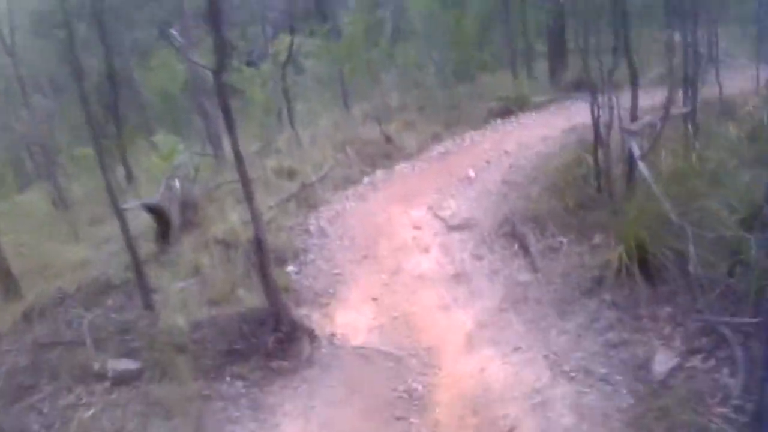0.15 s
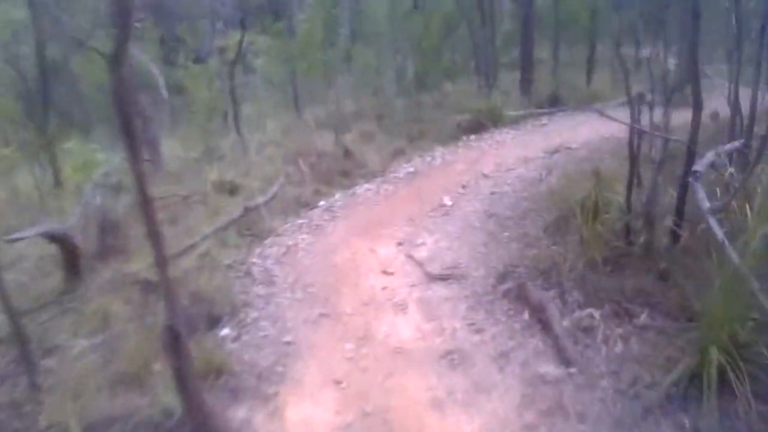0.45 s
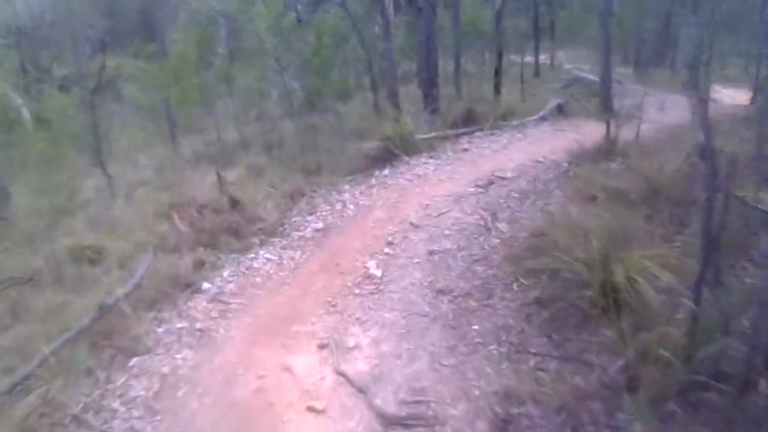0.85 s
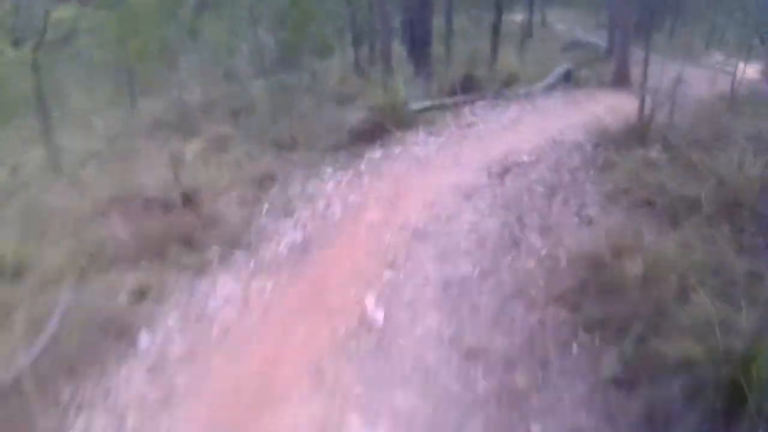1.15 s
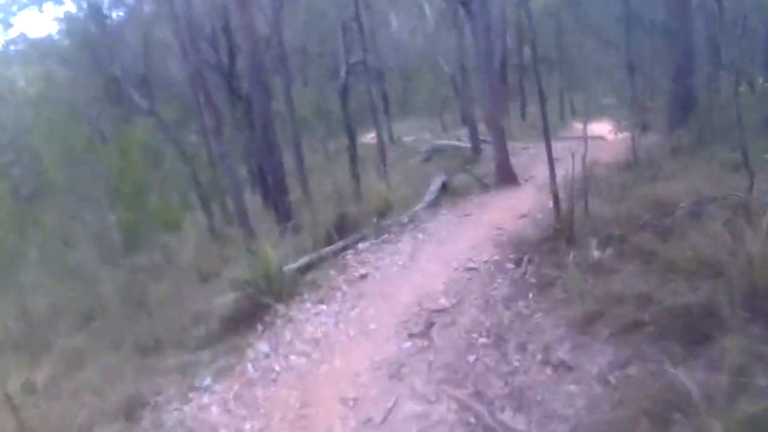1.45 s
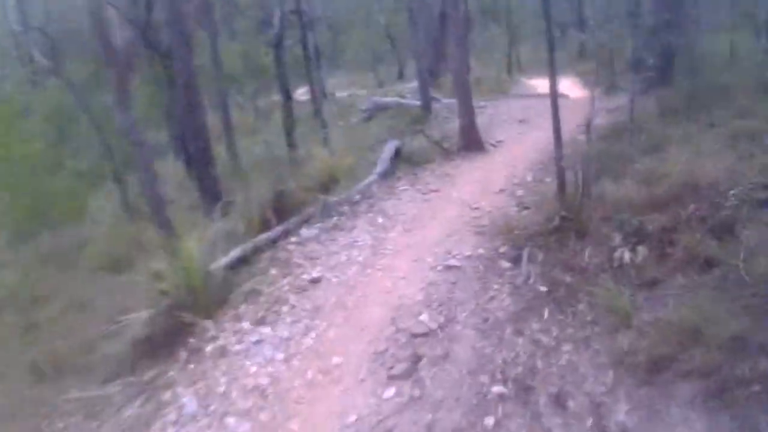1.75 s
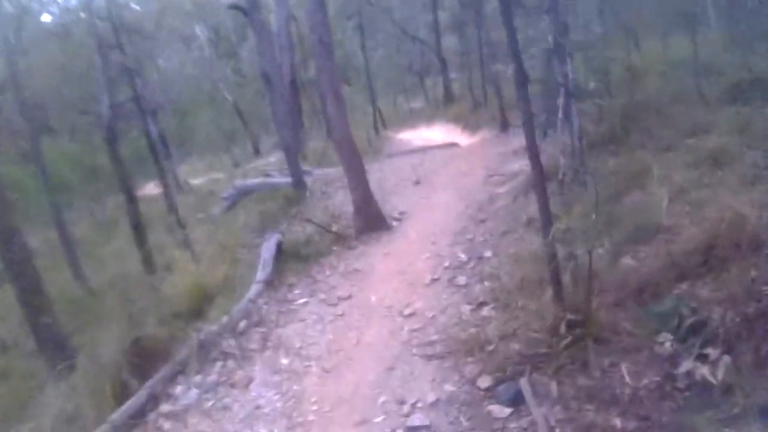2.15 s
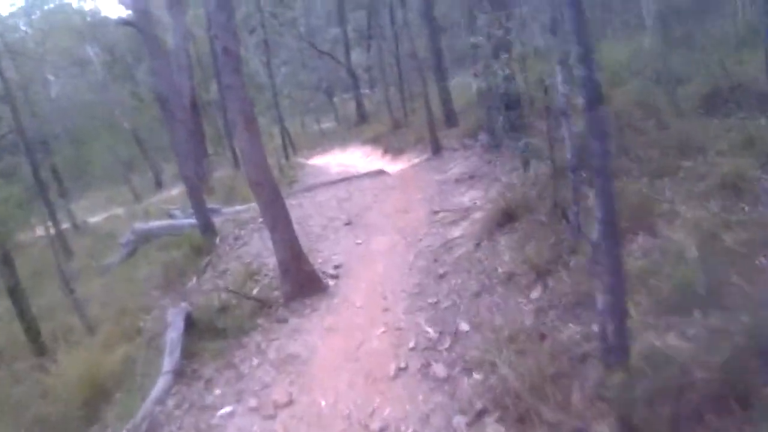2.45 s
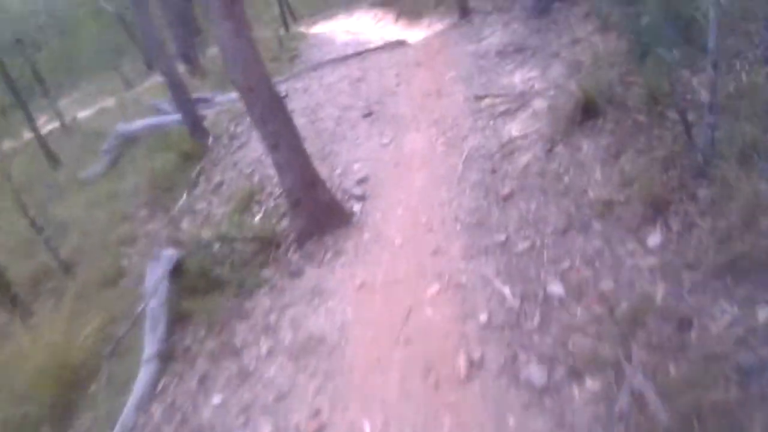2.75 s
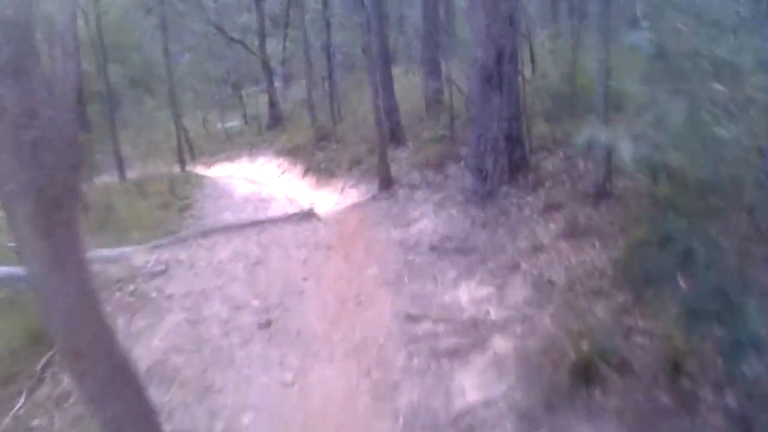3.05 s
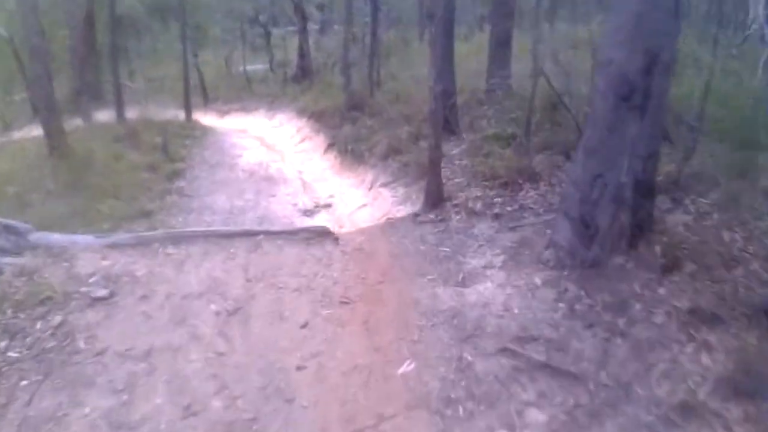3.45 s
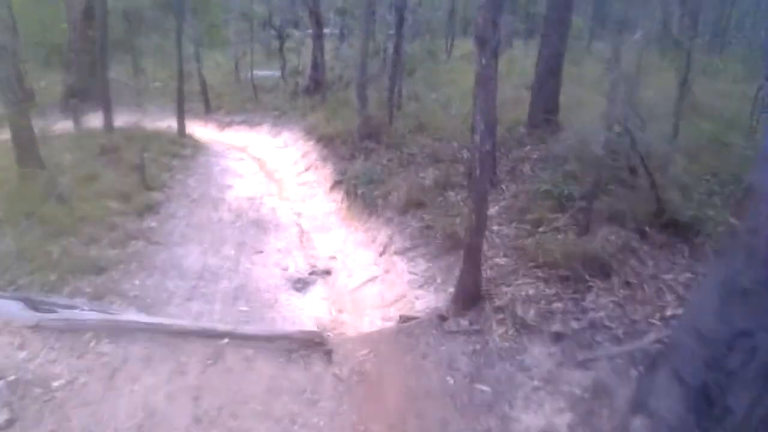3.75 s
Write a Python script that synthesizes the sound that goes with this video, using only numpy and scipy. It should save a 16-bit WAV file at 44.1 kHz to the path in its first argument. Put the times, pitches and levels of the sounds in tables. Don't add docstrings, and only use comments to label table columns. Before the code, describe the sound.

Mountain bike tyres crunch patchily over gravel, close and muffled inside a shut plastic case, outdoors. Stones crack and the chain slaps from the start; heavy dull thumps crowd 0.9-1.6 s, with a low mount hum near 1.3. A rapid burst of loud plastic knocks hits around 1.8-1.9. Rolling then calms, with a faint rising scrape at 2.7, bumps near 3.4 and sharp knocks at 3.7-3.8. Low wind buffets throughout.

```python
import sys
import numpy as np
from scipy import signal
from scipy.fft import rfft, irfft
from scipy.io import wavfile
from scipy.ndimage import uniform_filter1d

SR = 44100
rng = np.random.default_rng(int(sys.argv[2]) if len(sys.argv) > 2 else 0)


def to_wav(s):
    ch = np.atleast_2d(s).T
    pcm = np.round(np.clip(ch, -1, 1) * 32767)
    wavfile.write(sys.argv[1], SR, pcm.astype(np.int16))


def boost(x):
    u = np.asarray(x, float) / 20
    return 10 ** u


N = 171990

# (time [s], gravel level [dB], wind level [dB], fine grit level re gravel [dB])
RIDE = [(0, -41, -46.5, -3.5), (.3, -42.5, -49.5, 3.5), (.6, -40.5, -50.5, 4.5), (.8, -43, -49, -9),
        (1.0, -34, -44, -13.5), (1.1, -41, -49, -10.5), (1.3, -33, -38, -10), (1.6, -40, -50, 2),
        (1.9, -34.5, -50.5, -2.5), (2.22, -38.5, -53, 0.5), (2.28, -40.5, -44, -11),
        (2.33, -40.5, -48.5, 3.5), (2.8, -41, -49.5, 4), (3.32, -42.5, -49.5, 9), (3.355, -40, -56, -9.5),
        (3.39, -33.5, -46, -8), (3.55, -36, -53.5, 0), (3.9, -37, -49, -2)]
# (time [s], length [s], level [dB], pitch [Hz])
HUM_SWELLS = [
    (0.046, 0.06, -42, 107.3),
    (0.187, 0.043, -38.5, 105.3),
    (0.496, 0.058, -44.5, 106.2),
    (1.05, 0.12, -42, 107.5),
    (1.335, 0.21, -33.5, 105.1),
    (1.937, 0.062, -44.5, 107),
    (2.262, 0.031, -51, 105.3),
    (3.463, 0.061, -43.5, 110.2),
]
# (time [s], level [dB], ring [Hz], decay by 60 dB [s])
FRAME_THUMPS = [(.176, -21.5, 584, 0.08), (0.175, -22, 170, 0.059), (0.934, -17.5, 153, 0.022),
                (0.957, -16.5, 150.6, 0.068), (.955, -13.5, 588, 0.043), (1.137, -16, 472, 0.068),
                (1.155, -19, 316, 0.056), (1.281, -22, 474, 0.041), (1.332, -16.5, 420, 0.024),
                (1.527, -17, 123.5, 0.13), (1.526, -21, 172, 0.14), (1.537, -15.5, 600, 0.058),
                (3.405, -16, 580, 0.044), (3.866, -19, 255, 0.039)]
# (time [s], level [dB], ring [Hz])
MOUNT_KNOCKS = [(.1405, -24, 800), (.1445, -19, 930), (.385, -25, 890), (.4065, -24, 1080),
                (.588, -22, 1050), (.5965, -16, 1190), (.88, -23, 1090), (1.707, -20, 1130),
                (1.771, -20, 1000), (1.8075, -16, 700), (1.819, -11, 900), (1.8465, -13, 1050),
                (1.8527, -12, 970), (1.865, -15, 750), (1.8702, -12, 720), (1.8803, -8, 980),
                (1.8886, -11, 950), (2.018, -22, 850), (2.117, -20, 1120), (2.397, -22, 1100),
                (2.934, -26, 1000), (3.1605, -20, 880), (3.6803, -7, 1000), (3.7725, -15, 1210),
                (3.783, -13, 1060), (3.791, -15, 1020)]
# (time [s], tick level [dB], body level re tick [dB])
CHAIN_SLAPS = [(0.061, -69.5, 30), (0.3041, -55, 25), (0.4544, -60, 27), (0.4772, -59, 30),
               (0.92, -59, 29.5), (0.95, -53, 34.5), (1.133, -48.5, 27), (1.2113, -54, 28.5),
               (1.2875, -48, 20), (1.4896, -65, 33.5), (1.5244, -61.5, 31.5), (1.6183, -57, 27),
               (1.6554, -56, 29.5), (1.7696, -58.5, 30), (1.878, -63, 19.5), (1.9028, -56, 25),
               (1.9694, -59.5, 34), (2.068, -59, 29.5), (2.1797, -53.5, 30.5), (2.2162, -60, 23.5),
               (2.227, -58.5, 30.5), (2.396, -59, 28.5), (2.5113, -57.5, 26), (3.022, -58, 30.5),
               (3.0684, -57.5, 26.5), (3.68, -65, 26.5), (3.7836, -70.5, 37.5)]
# (time [s], tick level [dB], body level re tick [dB])
MORE_CHAIN_SLAPS = [(0.104, -67, 31), (0.1116, -59.5, 32.4), (0.2049, -76, 36.6), (0.2637, -65.5, 28),
                    (0.2707, -64, 31.3), (0.8368, -70.5, 37), (0.856, -66.5, 31), (0.8725, -68, 32),
                    (1.0541, -71, 32), (1.151, -57, 24), (1.1757, -64.5, 26), (1.22, -58, 30.5),
                    (1.3236, -65, 24), (1.346, -69.5, 26), (1.366, -62.5, 30), (1.4995, -53.5, 28),
                    (1.508, -64.5, 36), (1.533, -55.5, 26), (1.5629, -65.5, 37.5), (1.6913, -63, 25),
                    (1.8093, -63, 29), (1.8547, -72, 25), (1.916, -59, 27), (2.0358, -70, 22),
                    (2.3256, -78, 34), (2.405, -66, 27), (0.9569, -51.5, 35.4), (1.144, -57, 7.5),
                    (1.2928, -58.5, 17), (1.2978, -50, 26.7), (1.5366, -59, 34.4), (1.8025, -61, 23),
                    (1.9105, -64.5, 40), (1.976, -56, 27), (2.4165, -63, 29), (2.4844, -71.5, 36),
                    (2.5316, -62, 25.5)]
# (frequency [Hz], level per Hz [dB])
TICK_COLOUR = [(3600, 12.5), (4500, 3), (5500, 3.5), (6800, -17.5), (9000, -3), (11000, -13), (12500, -8),
               (15500, -24.5)]
# (time [s], level [dB], decay by 60 dB [s])
STONE_CRACKS = [(0.1425, -35, 0.028), (0.2048, -45, 0.038), (0.2547, -37, 0.022), (0.3464, -49, 0.037),
                (0.3671, -56, 0.022), (0.3889, -38.5, 0.03), (0.406, -39, 0.03), (0.5032, -48, 0.03),
                (0.5211, -35, 0.035), (0.5324, -37, 0.045), (0.5874, -29, 0.033), (0.5959, -27.5, 0.029),
                (0.7272, -42.5, 0.045), (0.8139, -44.5, 0.03), (0.8349, -44, 0.032), (0.8844, -35.5, 0.021),
                (0.9117, -43, 0.03), (0.9322, -28, 0.021), (0.9874, -45, 0.027), (1.0165, -40, 0.035),
                (1.0304, -42, 0.019), (1.066, -34, 0.037), (1.2254, -39, 0.027), (1.256, -47, 0.034),
                (1.2804, -23.5, 0.033), (1.3602, -39, 0.025), (1.6885, -47, 0.026), (1.7094, -48, 0.03),
                (2.116, -34, 0.022), (2.3126, -66, 0.03), (2.383, -43, 0.022), (2.9461, -40, 0.026),
                (3.4829, -35.5, 0.036), (3.5838, -34, 0.03), (3.6734, -32, 0.025), (3.6974, -38.5, 0.041),
                (3.7712, -33, 0.035), (3.7908, -31, 0.055)]
# (frequency [Hz], level per Hz [dB])
CRACK_COLOUR = [(400, -3.5), (1100, 7.5), (2000, -0.5), (2700, -7.5), (3400, -17), (6000, -27)]
# (time [s], length [s], level [dB], centre [Hz])
CRUNCH_BURSTS = [(0.102, 0.0045, -38.5, 1010), (0.391, 0.027, -40, 990), (0.485, 0.03, -35, 860),
                 (0.668, 0.014, -48, 980), (0.876, 0.026, -35.5, 920), (0.911, 0.054, -34.5, 730),
                 (1.012, 0.0052, -31, 1035), (1.055, 0.014, -33.5, 810), (1.12, 0.041, -31, 770),
                 (1.204, 0.065, -38.5, 1050), (1.273, 0.038, -32, 637), (1.349, 0.052, -40, 616),
                 (1.499, 0.019, -26, 896), (1.519, 0.018, -25.5, 544), (1.555, 0.011, -32.5, 646),
                 (1.679, .05, -34.5, 834), (1.806, 0.082, -30.5, 560), (1.902, 0.034, -34, 990),
                 (1.937, 0.099, -45.5, 850), (2.102, 0.12, -40, 850), (2.939, 0.014, -35, 890),
                 (3.29, 0.028, -37.5, 1080), (3.321, 0.021, -32, 454), (3.42, 0.025, -28.5, 710),
                 (3.455, 0.036, -31, 456), (3.508, 0.02, -33.5, 333)]
# (frequency [Hz], level per Hz [dB])
GRAVEL_COLOUR = [(90, -7), (300, -6), (600, -7.5), (1050, -5.5), (1500, -18.5), (2600, -33.5), (3500, -35),
                 (6000, -42)]
# (frequency [Hz], width [Hz], depth [0-1])
HOUSING_NOTCHES = [
    (2960, 350, .7),
    (4010, 500, 1),
    (5980, 700, .95),
    (7990, 900, .97),
]

T = np.arange(int(.3 * SR)) / SR


def unit(x):
    return x / np.sqrt(np.mean(x ** 2))


def curve(table, column):
    rows = np.array(table)
    return np.interp(np.arange(N) / SR, rows[:, 0], rows[:, column])


def colour(x, points, low_db=-30):
    rows = np.array(points)
    log_hz = np.log(np.arange(1, 2050) * SR / 4096)
    level_db = np.interp(log_hz, np.log(rows[:, 0]), rows[:, 1], left=rows[0, 1] + low_db)
    cepstrum = irfft(level_db * np.log(10) / 20)
    cepstrum[1:2048] *= 2
    cepstrum[2049:] = 0
    response = irfft(np.exp(rfft(cepstrum)))[:1024]
    return signal.fftconvolve(x, response)[:len(x)]


def band(x, hz, width_hz):
    return signal.lfilter(*signal.iirpeak(hz, hz / width_hz, SR), x)


def walk(rate):
    k = int(SR / rate)
    steps = np.repeat(rng.standard_normal(N // k + 1), k)
    return unit(uniform_filter1d(uniform_filter1d(steps, k), k)[:N])


def stones(per_s, spread_db):
    chance, size, sign = rng.random(N), rng.exponential(size=N), np.sign(rng.standard_normal(N))
    hit = np.clip((per_s / SR - chance) * SR / 50, 0, 1)
    return unit(hit * boost(spread_db * np.minimum(size, 3)) * sign)


def add(out, s, x):
    i = int(s * SR)
    out[i:i + len(x)] += x[:N - i]


def fade(t60):
    return np.exp(-np.log(1000) * T / t60)


def soft_rise(rise_s):
    return np.sin(np.pi / 2 * np.clip(T / rise_s, 0, 1)) ** 2


def swell(t, length, rise_s, fall_s):
    return np.clip(t / rise_s, 0, 1) * np.exp(-np.maximum(t - length, 0) / fall_s)


def wind():
    low = signal.butter(2, (18, 79), "band", fs=SR, output="sos")
    return unit(signal.sosfilt(low, rng.standard_normal(N))) * boost(curve(RIDE, column=2) + 4.5)


def hum():
    out, t = np.zeros(N), np.arange(SR // 2) / SR
    for s, length, db, hz in HUM_SWELLS:
        pitch_hz = hz + 8.6 * np.exp(-t / 0.038)
        tone = np.sqrt(2) * np.sin(2 * np.pi * np.cumsum(pitch_hz) / SR)
        add(out, s, boost(db) * swell(t, length, rise_s=0.011, fall_s=0.055) * tone)
    roughness = 1 + .15 * walk(27)
    return out * roughness


def thumps():
    out = np.zeros(N)
    for s, db, hz, t60 in FRAME_THUMPS:
        add(out, s, boost(db) * np.sin(2 * np.pi * hz * T) * fade(t60) * soft_rise(0.0013))
    return out


def knocks():
    out = np.zeros(N)
    for s, db, hz in MOUNT_KNOCKS:
        tones = np.sin(2 * np.pi * hz * T) + boost(-8.5) * np.sin(np.pi * hz * T)
        ring = tones * fade(.012)
        tick = boost(-15) * np.sin(2 * np.pi * 2100 * T) * fade(0.0027)
        noise = rng.standard_normal(len(T))
        rustle = boost(-17) * unit(band(band(noise, hz, 450), hz, 450)) * fade(.05)
        add(out, s, boost(db + 4.5) * soft_rise(.0008) * (ring + tick + rustle))
    return out


def chain():
    top, body = np.zeros(N), np.zeros(N)
    tick = fade(.007) * np.clip(T / 0.00089, 0, 1)
    bounces_per_s = 230
    for s, db, body_db in CHAIN_SLAPS + MORE_CHAIN_SLAPS:
        noise = rng.standard_normal(len(T))
        bounce = rng.random(len(T)) < bounces_per_s / SR
        bounces = signal.fftconvolve(bounce, tick)[:len(T)]
        jangle = boost(-10) * fade(.045) * (0.32 + 2 * bounces)
        slap = noise * (tick + jangle)
        add(top, s, boost(db) * slap)
        add(body, s, boost(db + body_db) * slap)
    scale = np.std(colour(rng.standard_normal(N), TICK_COLOUR))
    ticks = boost(1) * colour(top, TICK_COLOUR) / scale
    main_ring = boost(17.0) * band(band(body, 1668, 830), 1668, 830)
    upper_ring = boost(-18.5) * band(body, 3370, 740)
    lower_ring = boost(6) * band(body, 1050, 400)
    return ticks, main_ring + upper_ring + lower_ring


def scrape():
    start_s, length_s, from_hz, to_hz = 2.71, .15, 740, 1080
    share = np.clip((np.arange(N) / SR - start_s) / length_s, 0, 1)
    hz = from_hz + (to_hz - from_hz) * share
    shape = np.sqrt(2 * np.abs(np.sin(np.pi * share)))
    return boost(-36) * shape * walk(340) * np.sin(2 * np.pi * np.cumsum(hz) / SR)


def cracks():
    out = np.zeros(N)
    rise = np.clip(T / .0015, 0, 1)
    for s, db, t60 in STONE_CRACKS:
        add(out, s, boost(db) * rng.standard_normal(len(T)) * fade(max(t60, .005)) * rise)
    scale = np.std(colour(rng.standard_normal(N), CRACK_COLOUR))
    return boost(2.5) * colour(out, CRACK_COLOUR) / scale


def bumps():
    out, hits = np.zeros(N), stones(per_s=1100, spread_db=2.2)
    wide = unit(colour(hits, GRAVEL_COLOUR))
    fade_s, q = .007, 1.5
    for s, length, db, hz in CRUNCH_BURSTS:
        i = int(s * SR)
        count = min(int((length + 6 * fade_s) * SR), N - i)
        t = np.arange(count) / SR
        ring = band(band(hits[i:i + count], hz, hz / q), hz, hz / q)
        crunch = unit(ring) + boost(-3) * wide[i:i + count]
        dull = signal.lfilter(*signal.butter(2, 1.9 * hz, fs=SR), crunch)
        add(out, s, boost(db) * swell(t, length, fade_s, fade_s) * dull)
    return out


def gravel():
    clicks = stones(per_s=800, spread_db=3.2) + 0.99 * rng.standard_normal(N)
    bed = unit(colour(clicks, GRAVEL_COLOUR, low_db=-17))
    split_hz = 1500
    low = signal.sosfilt(signal.butter(2, split_hz, fs=SR, output="sos"), bed)
    high = signal.sosfilt(signal.butter(2, split_hz, "high", fs=SR, output="sos"), bed)
    grit = high * boost(curve(RIDE, column=3) + 1.8 * walk(35))
    patches_db = 1.0 * walk(24.66) + 1.7 * walk(110)
    return (low - grit) * boost(curve(RIDE, column=1) + patches_db)


def muffle(x):
    x = signal.sosfilt(signal.cheby2(6, 21, 3850, fs=SR, output="sos"), x)
    return signal.sosfilt(signal.butter(3, 4800, fs=SR, output="sos"), x)


def scene():
    ride = gravel() + bumps() + hum() + wind() + thumps() + knocks()
    ticks, slaps = chain()
    return (muffle(ride + slaps + cracks() + scrape()) + ticks)[None]


def band_limit(x):
    return signal.sosfilt(signal.butter(12, 15600, fs=SR, output="sos"), x)


def record(dry):
    x = dry
    for hz, width_hz, depth in HOUSING_NOTCHES:
        x = x - depth * band(x, hz, width_hz)
    end_fade = np.clip(np.arange(N)[::-1] / (.003 * SR), 0, 1)
    hiss = boost(-94.5) * rng.standard_normal(x.shape)
    return band_limit(x * end_fade + hiss)


dry = scene()
out = record(dry)
to_wav(out)
```